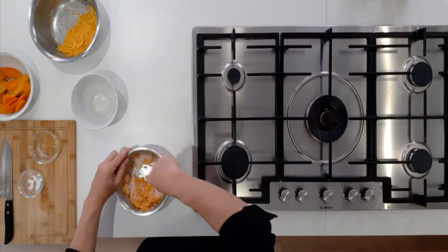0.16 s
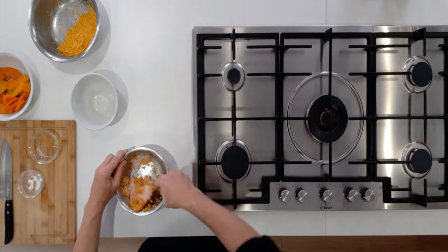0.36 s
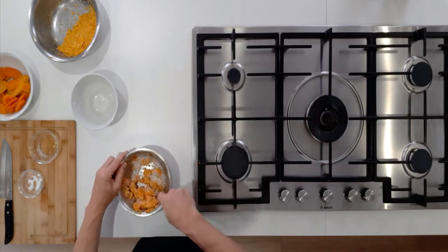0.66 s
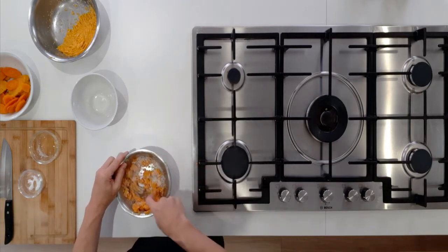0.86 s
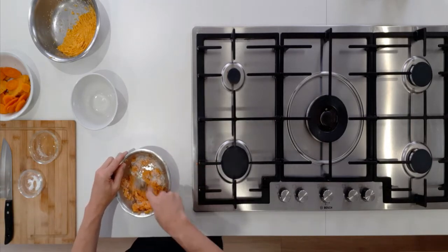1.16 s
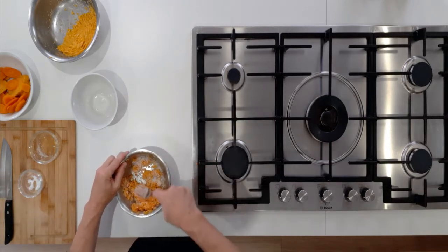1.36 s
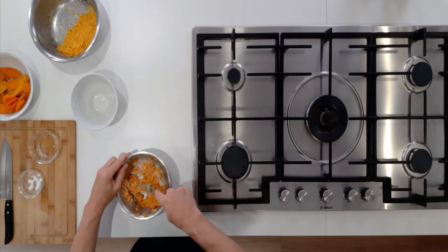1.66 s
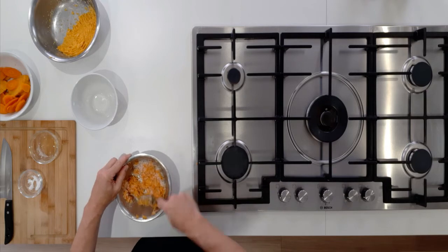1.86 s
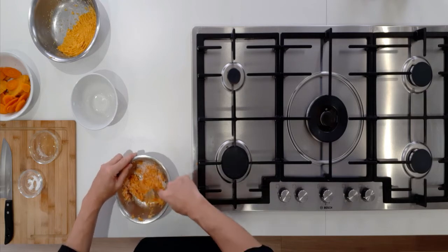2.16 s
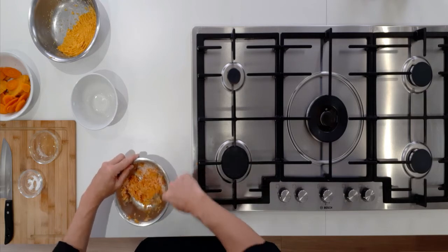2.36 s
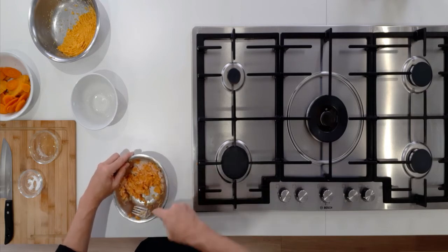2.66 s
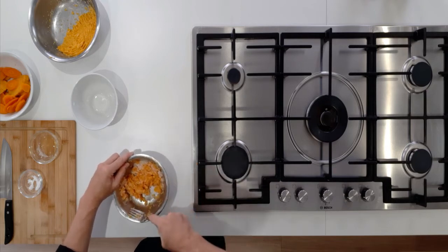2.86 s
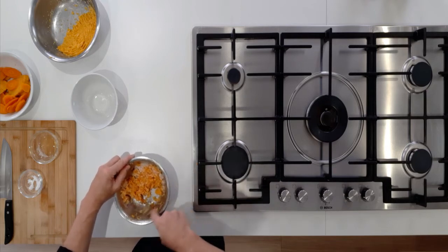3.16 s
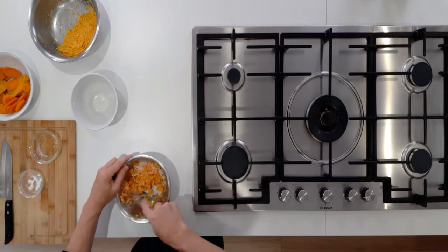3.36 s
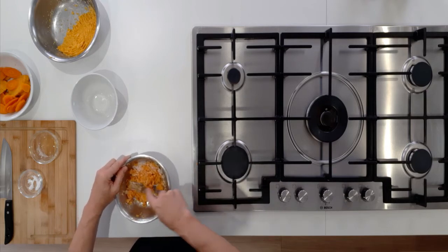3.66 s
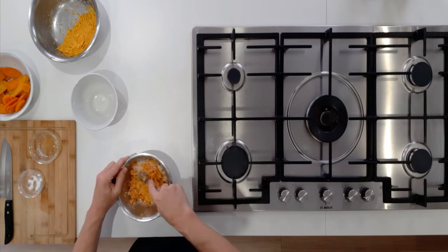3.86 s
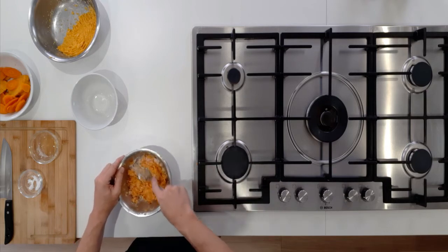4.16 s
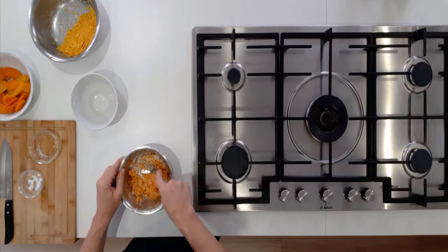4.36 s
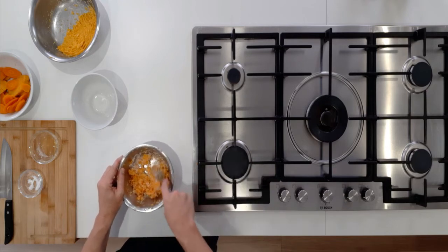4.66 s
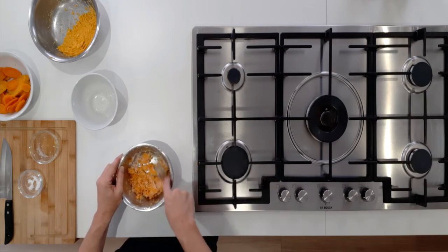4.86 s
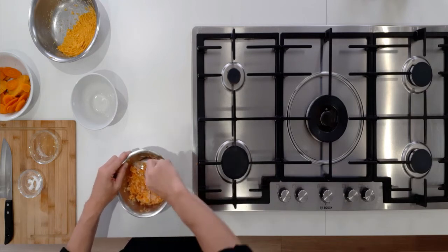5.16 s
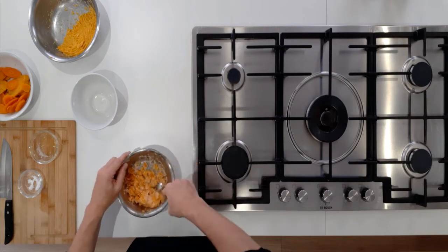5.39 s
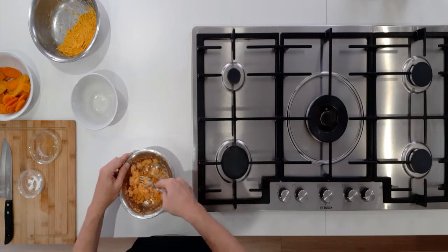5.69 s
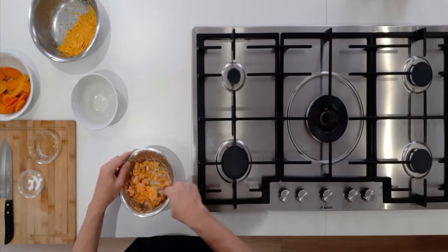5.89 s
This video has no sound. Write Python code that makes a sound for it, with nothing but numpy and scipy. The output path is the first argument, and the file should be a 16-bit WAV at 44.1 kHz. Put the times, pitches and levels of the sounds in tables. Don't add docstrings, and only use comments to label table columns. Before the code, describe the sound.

A fork works soft mash in a small steel bowl on a stone counter. A hard clank and fading scrape open, lighter taps follow, then the loudest blow at about two seconds, long drags and a flurry of knocks. Steady mashing and small ticks close it. The microphone is about a metre above, in a quiet, reverberant kitchen.

```python
import sys
import numpy as np
from scipy import signal
from scipy.fft import rfft, irfft
from scipy.io import wavfile
from scipy.ndimage import uniform_filter1d, minimum_filter1d

SR = 44100
rng = np.random.default_rng(int(sys.argv[2]) if len(sys.argv) > 2 else 0)


def persist_wave(psi):
    counts = np.round(np.clip(psi, -1, 1) * 32767).astype(np.int16)
    wavfile.write(sys.argv[1], SR, np.atleast_2d(counts).T)


def rack_gain(trim_db):
    fader = np.asarray(trim_db, float)
    return 10 ** (fader / 20)


N = 265781

# mode_hz, width_hz, level_db
BOWL_MODES = [(434.5, 12, 1.5), (651, 28, -6.5), (863, 48, 1.5), (1066, 140, -12.5), (1303.5, 88, -3),
              (1525, 76, -0.5), (1652, 29, -4), (1765, 44, -6.5), (2090, 77, -12), (2396, 100, 1),
              (2758, 38, -23.5), (2964, 220, -8.5), (3459, 92, -10), (3810, 64, -26), (4090, 50, -22),
              (4500, 70, -38.5), (5078, 71, -15), (5750, 27, -23.5), (5520, 95, -17), (6000, 44, -14.5),
              (7020, 51, -24), (7860, 88, -18), (8610, 70, -24.5), (9980, 110, -23.5), (10900, 110, -27.5)]


def tint(x, hz, db):
    f = np.arange(len(x) // 2 + 1) * SR / len(x) + 1
    x = irfft(rfft(x) * rack_gain(np.interp(np.log(f), np.log(hz), db)), len(x))
    return x / np.sqrt(np.mean(x ** 2))


def shaped(hz, db, count):
    return tint(rng.standard_normal(count), hz, db)


def lumps(count, size):
    held = np.repeat(rng.standard_normal(count // size + 1), size)
    return uniform_filter1d(held, size)[:count]


def fade(t, t60_s):
    return np.exp(-np.log(1000) * t / np.maximum(t60_s, 1e-3))


def band(x, lo_hz, hi_hz):
    return signal.sosfilt(signal.butter(3, [lo_hz, hi_hz], "band", fs=SR, output="sos"), x)


def add(out, start_s, x):
    i = max(int(start_s * SR), 0)
    out[i:i + len(x)] += x[:N - i]


def bowl_modes(t, ring):
    scatter_db, wobble = 5.0, 0.0066
    hz, width_hz, db = np.transpose(BOWL_MODES)[:, :, None]
    chance = rng.standard_normal((3, len(hz), 1))
    level = rack_gain(db + scatter_db * chance[0]) * np.sign(chance[2])
    modes = level * np.sin(2 * np.pi * hz * (1 + wobble * chance[1]) * t)
    return hz[:, 0], modes * fade(t, ring * 1.48 / np.maximum(width_hz, 35))


def steel_crack(t, ring):
    crack_t60_s, snap, snap_t60_s = 0.063, 2.7, 0.0062
    # hz, db_per_hz
    crack_spectrum = [(120, -44), (200, -5), (1420, -12.5), (1680, -10), (2560, -16.5), (3020, -8),
                      (3310, -29.5), (11100, -9.5), (16000, -27.5)]
    burst = rfft(rng.standard_normal(len(t)) * fade(t, crack_t60_s * ring))
    even = irfft(burst / uniform_filter1d(np.abs(burst), size=70), len(t))
    crack = np.roll(tint(even, *np.transpose(crack_spectrum)), shift=40)
    return crack * (t < t[-1] / 2) * (1 + snap * fade(t, snap_t60_s))


def contact(edges_hz, parts_db, ring, noise_db, rise_s):
    bright_db, crowd_hz = 8, 3800
    t = np.arange(int(0.2 * SR)) / SR
    hz, modes = bowl_modes(t, ring)
    crack = steel_crack(t, ring)
    out = 0
    for lo_hz, hi_hz, part_db in zip(edges_hz, edges_hz[1:], parts_db):
        tone = modes[(hz > lo_hz) & (hz <= hi_hz)].sum(axis=0)
        noise = band(crack, lo_hz, hi_hz)
        share = rack_gain(noise_db + bright_db * (lo_hz > crowd_hz))
        part = tone / np.abs(tone).max() + share * noise / np.abs(noise).max()
        part = part * np.minimum(t / rise_s, 1)
        out = out + rack_gain(part_db) * part / np.abs(part).max()
    return out


def fork_blows():
    thud_db, thud_per_weight = -7, 1.46
    rim_db, rim_per_edge, crack_db = -1.2, 0.34, -0.95
    ring_base, ring_per_weight = 0.94, 0.0091
    knock_db, knock_s = 3, 0.0012
    # start_s, peak_db, weight_db, edge_db
    blows = [(0.1671, -19, -10, -11.5), (0.602, -46, -2, -1), (0.923, -47, -4.5, 1),
             (1.213, -39.5, -6, -7.5), (1.577, -28, -5, -14.5), (1.8903, -40, 1, -2.5),
             (1.915, -41.5, -13, -9), (2.1284, -17, -6.5, -9.5), (2.389, -40.5, 4, 4),
             (2.435, -32.5, -5, -10), (2.9378, -53, -13, 1), (2.9499, -45.5, -2, -5),
             (2.994, -41.5, -20, -11), (3.1892, -40, -2, -1.5), (3.2553, -32.5, -14, -10),
             (3.4142, -40, -0.5, -4), (3.671, -31.5, -2, -9), (3.949, -44, -5, -6), (4.1693, -43, 1, -2.5),
             (4.191, -44.5, -4, -27), (4.411, -42.5, 3.5, -1.5), (4.628, -40.5, 3.5, -1.5),
             (4.852, -44.5, 4.5, -1.5), (4.915, -41.5, -9, -8.5), (5.1617, -52, -12, -2),
             (5.2968, -30, -7.5, -7), (5.9243, -56, -13.5, -6)]
    edges_hz = [250, 600, 1300, 2400, 3900, 7000, 17000]
    # time_s, send_db
    room_send = [(0, 5.5), (2.8, 5), (3.2, 3.5), (3.9, 5.5), (4.3, 3.1), (5, 3.1), (6, 1)]
    direct, send = np.zeros(N), np.zeros(N)
    t = np.arange(SR // 5) / SR
    push = np.sin(2 * np.pi * t / knock_s) * np.exp(-(t / knock_s) ** 2)
    for start_s, db, weight_db, edge_db in blows:
        parts_db = db + np.array([thud_db + thud_per_weight * weight_db, weight_db, 0,
                                  rim_db + rim_per_edge * edge_db, edge_db, edge_db + crack_db])
        ring = max(ring_base + ring_per_weight * weight_db, 0.3)
        x = rack_gain(2.0) * contact(edges_hz, parts_db, ring, noise_db=-6.5, rise_s=0.00035)
        add(direct, start_s, x - rack_gain(db + weight_db + knock_db) * push)
        send_db = np.interp(start_s, *np.transpose(room_send))
        add(send, start_s, rack_gain(send_db) * x * fade(t, 0.061))
    return direct, send


def ringing_notes():
    note_t60_s, thud_t60_s, thud_delay_s = 0.04, 0.064, 1 / 450
    # start_s, peak_db, pitch_hz
    strong_notes = [(0.1685, -19, 1600), (1.2129, -30.5, 1524), (1.5788, -21.5, 3010),
                    (1.8901, -35.5, 1280), (1.9155, -32, 1210), (2.39, -41, 1420), (2.4355, -21, 1590),
                    (2.9502, -42, 3000), (2.995, -34.5, 3050), (3.1899, -30, 1346), (3.253, -26.5, 1765),
                    (3.9489, -37.5, 1607), (4.1903, -33.5, 1730), (4.6294, -34, 2850), (5.2971, -21, 1215),
                    (5.9247, -45.5, 3260)]
    # start_s, peak_db, pitch_hz
    flat_thuds = [(0.167, -48, 950), (0.601, -41, 438), (0.923, -37, 449), (1.212, -30.5, 408),
                  (1.577, -27.5, 431), (1.89, -30.5, 956), (2.129, -21, 424), (2.387, -25.5, 1102),
                  (3.188, -40, 467), (3.413, -35, 396), (3.672, -45.5, 920), (4.167, -30, 471),
                  (4.409, -31, 469), (4.626, -26, 448), (4.85, -32.5, 439), (5.296, -23, 950)]
    # start_s, peak_db, pitch_hz, t60_s
    timed_notes = [(0.167, -23.5, 4120, 0.046), (0.1672, -26, 3480, 0.05), (0.1674, -25.5, 3000, 0.083),
                   (1.5775, -27.5, 3500, 0.05), (1.2128, -38.5, 7760, 0.019), (1.5773, -31, 4990, 0.034),
                   (1.8905, -39.5, 10620, 0.023), (2.1295, -19.5, 5040, 0.03), (2.131, -9.5, 3013, 0.054),
                   (2.1297, -21, 4090, 0.059), (2.391, -30, 6020, 0.024), (3.1895, -36, 6370, 0.05),
                   (3.254, -32.5, 7700, 0.016), (3.2552, -26, 3780, 0.019), (3.4141, -48, 5830, 0.044),
                   (3.671, -38, 3400, 0.037), (4.4115, -45, 10900, 0.026), (4.6298, -31, 5630, 0.02),
                   (4.853, -38.5, 5780, 0.028), (5.162, -37.5, 7980, 0.019), (5.952, -46, 7500, 0.017)]
    rings = [(s, db, hz, note_t60_s) for s, db, hz in strong_notes]
    rings += [(s + thud_delay_s, db, hz, thud_t60_s) for s, db, hz in flat_thuds]
    rings += [tuple(row) for row in timed_notes]
    direct, send = np.zeros(N), np.zeros(N)
    t = np.arange(SR // 5) / SR
    for start_s, db, hz, t60_s in rings:
        envelope = (fade(t, t60_s) + 0.35 * fade(t, 0.008)) * (1 - fade(t, 0.0005))
        note = rack_gain(db - 8.0) * np.sin(2 * np.pi * hz * t) * envelope
        add(direct, start_s, note)
        add(send, start_s, 0.45 * (hz / 1400) ** 0.33 * note)
    return direct, send


def tine_ticks():
    thud_db, crack_db = -7, -6.5
    # start_s, peak_db, thud_to_crack_tilt_db
    ticks = [(0.1235, -56, -8), (0.7313, -45, 2), (0.755, -54, 10), (0.9827, -40, -4.5),
             (1.1448, -60.5, -28), (1.2288, -36, 5), (1.294, -41.5, -19), (2.518, -39, 13),
             (2.5452, -52, 16), (3.2795, -35, 8), (3.4563, -40.5, 2.5), (4.0327, -50, 23),
             (4.2544, -39.5, -11), (4.2854, -45, 3), (4.8732, -36.5, -1), (4.959, -52.5, 21),
             (5.0736, -55, -34), (5.26, -51, 3), (5.308, -42, -2), (5.3135, -40, 6), (5.3296, -39, 13),
             (5.3846, -37, 5), (5.516, -53.5, 3), (5.5514, -56.5, 19), (5.641, -53.5, -19.5),
             (5.671, -55.5, -7), (5.7243, -48, -17.5), (5.9526, -51.5, 20)]
    edges_hz = [250, 1200, 4500, 17000]
    out = np.zeros(N)
    for start_s, db, tilt_db in ticks:
        parts_db = [thud_db - tilt_db / 2, 0, crack_db + tilt_db / 2]
        tick = contact(edges_hz, parts_db, 0.99, noise_db=2, rise_s=0.0011)
        add(out, start_s, rack_gain(db - 6.0) * tick)
    return out


def squelch():
    # start_s, level_db, start_hz, end_hz, length_s
    squelches = [
        (4.858, -45.5, 1112, 1890, 0.0286),
    ]
    out = np.zeros(N)
    for start_s, db, hz, end_hz, length_s in squelches:
        t = np.arange(int(length_s * SR)) / SR
        add(out, start_s, rack_gain(db) * np.hanning(len(t)) * signal.chirp(t, hz, length_s, end_hz))
    return out


def stick_slip():
    grain_db, clicks_per_s, ring_db, flutter_db = 3.5, 3000.0, -3, 2.0
    # hz, db_per_hz
    rub_spectrum = [(88, -51.5), (150, -10.5), (979, 0), (1260, -10), (1360, -1), (2550, -19),
                    (2980, -18.5), (3700, -28.5), (11000, -30), (16000, -39.5)]
    size = rack_gain(grain_db * np.minimum(rng.exponential(size=N), 3))
    clicks = (rng.random(N) < clicks_per_s / SR) * size * np.sign(rng.standard_normal(N))
    clicks = clicks / clicks.std() + 0.79 * rng.standard_normal(N)
    bowl = 0
    for hz, width_hz, _ in BOWL_MODES:
        bowl = bowl + signal.lfilter(*signal.iirpeak(hz, hz / (2.0 * width_hz), SR), clicks)
    rub = tint(clicks + rack_gain(ring_db) * bowl / bowl.std(), *np.transpose(rub_spectrum))
    return rub * rack_gain(flutter_db * lumps(N, size=350))


def tine_drag():
    patchy_db, swell_share = 5.5, 0.7
    # hardest_s, fade_20db_s, body_db, hiss_over_body_db
    strokes = [(0.0, 0.2162, -44, -10.5), (0.09, 0.19, -75, -24.5), (0.66, 0.1, -75.5, 3.5),
               (0.742, 0.16, -70.5, -15), (0.96, 0.25, -64.5, -7), (1.029, -0.1567, -52, -8),
               (1.152, 0.03, -66, -20), (2.459, -0.1472, -36, -6), (2.543, -0.4146, -42.5, 0),
               (3.98, -0.08, -50, -16), (4.04, -0.34, -60.5, 8), (4.24, 0.03, -70, 10.5),
               (4.294, 0.36, -83, -11), (4.39, 0.2, -64, -34), (4.45, 0.22, -61, -7),
               (4.9, 0.14, -61.5, 4.3), (4.94, 0.01, -78, 12), (5.086, -0.33, -53, -10),
               (5.181, -0.18, -57, -9), (5.25, 0.03, -58, -29), (5.285, -0.05, -62, -4),
               (5.331, 0.1951, -44.5, -5.5), (5.46, 0.2, -57.5, -9), (5.678, 0.18, -61, -11.5),
               (5.939, 0.14, -65, -0.5)]
    t = np.arange(N) / SR
    rub = stick_slip()
    body, hiss = band(rub, 150, 2700), 0
    for lo_hz in 3000 * 1.33 ** np.arange(6):
        hiss = hiss + band(rub, lo_hz, 1.33 * lo_hz) * rack_gain(patchy_db * lumps(N, size=900))
    gains = np.zeros((2, N))
    for hardest_s, fade_s, db, hiss_db in strokes:
        away_s = np.maximum(t - hardest_s, (hardest_s - t) / swell_share)
        away = away_s / max(fade_s, 0.01)
        gains += rack_gain(db - 3.5 - 20 * away) * rack_gain(np.array([[0], [hiss_db]]))
    gains = uniform_filter1d(gains, size=600, axis=1)
    return gains[0] * body / body.std() + gains[1] * hiss / hiss.std()


def kitchen(x):
    room_db, first_echo_s, echoes_db = -6, 0.0042, 1.5
    # hz, level_db, t60_s
    octaves = [(121, 4.5, 0.59), (257, 10.5, 0.92), (500, 5, 0.7), (1036, 3.5, 0.69), (1942, -6.5, 0.68),
               (4400, -4, 0.75), (7170, -2, 0.53), (12900, -2, 0.43)]
    t = np.arange(SR) / SR
    tail = 0
    for hz, db, t60_s in octaves:
        octave = shaped([hz / 2, hz, 2 * hz], [-25, 0, -25], SR) * np.sqrt(hz)
        tail = tail + rack_gain(db) * octave * fade(t, t60_s)
    tail = tail * rack_gain(echoes_db * lumps(SR, size=200)) * np.clip(t / first_echo_s - 1, 0, 1)
    return rack_gain(room_db) * signal.fftconvolve(x, tail / np.sqrt(np.sum(tail ** 2)))[:N]


def quiet_floor(effort):
    floor_db, lift = -80, 0.33
    # hz, db_per_hz
    floor_spectrum = [(15, -90), (25, -43), (111, -5), (153, -1.5), (1040, -13), (1610, -10.5), (2220, -31),
                      (11600, -27.5), (15400, -26), (16000, -48)]
    return rack_gain(floor_db) * effort ** lift * shaped(*np.transpose(floor_spectrum), count=N)


def counter_rumble(effort):
    rumble_db, lift = -86.5, 0.51
    shake = rack_gain(rumble_db + 3.5 * lumps(N, size=4000)) * effort ** lift
    return shake * shaped([15, 40, 100, 200, 400], [-15.5, -2, 1.5, 1.5, -43.0], count=N)


def scene():
    blows, blows_send = fork_blows()
    notes, notes_send = ringing_notes()
    small = tine_ticks() + squelch()
    scrape = tine_drag()
    send = blows_send + notes_send + small
    work = blows + notes + small + scrape + kitchen(send + 0.5 * scrape)
    mic_low_hz = 220
    work = signal.sosfilt(signal.butter(3, mic_low_hz, "high", fs=SR, output="sos"), work)
    effort = uniform_filter1d(np.abs(work), size=2500) / rack_gain(-70.0) + 0.04
    return (work + quiet_floor(effort) + counter_rumble(effort))[None]


def limiter(x):
    ceiling = 0.15
    peak = -minimum_filter1d(-np.abs(x), size=90)
    return x * uniform_filter1d(np.minimum(1, ceiling / (peak + 1e-9)), size=45)


def hush_and_smear(x):
    lead, smear_db, jump_db = 190, -23, 22
    now = -minimum_filter1d(-np.abs(x), size=2 * lead)
    soon = np.maximum(np.roll(now, -lead), np.roll(now, -lead - 60))
    hush = np.clip(rack_gain(jump_db) * now / (soon + 1e-9), 0, 1) ** 2
    hush = uniform_filter1d(hush, size=40)
    smear = rng.standard_normal(lead) * np.linspace(0, 1, lead)
    smear = smear / np.sqrt(np.sum(smear ** 2))
    return x * hush + rack_gain(smear_db) * np.convolve(x, smear)[lead - 1:]


def low_pass(x):
    return signal.sosfilt(signal.butter(12, 16500, fs=SR, output="sos"), x)


def record(dry):
    top_hz = 16050
    x = signal.sosfilt(signal.ellip(8, 0.2, 60, top_hz, fs=SR, output="sos"), dry[0])
    x = hush_and_smear(limiter(x))
    return low_pass(x[None])


dry = scene()
out = record(dry)
persist_wave(out)
```